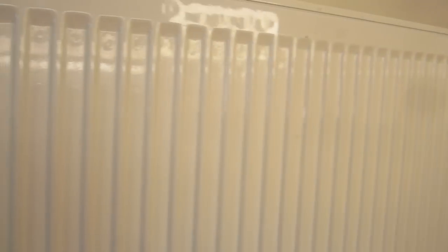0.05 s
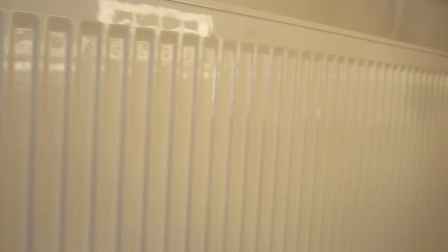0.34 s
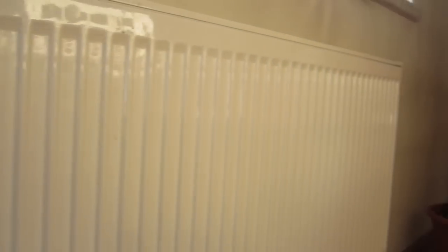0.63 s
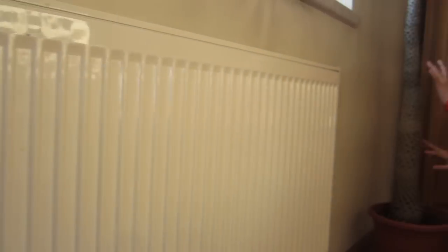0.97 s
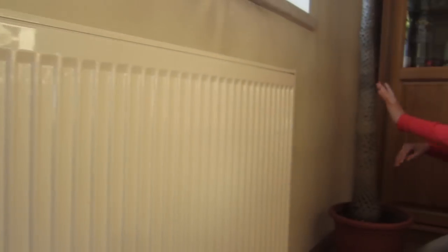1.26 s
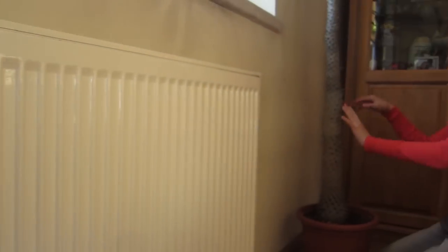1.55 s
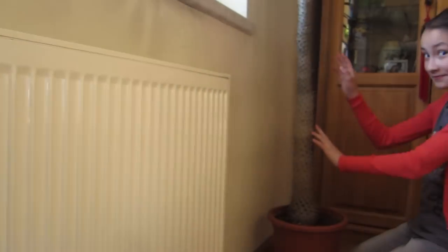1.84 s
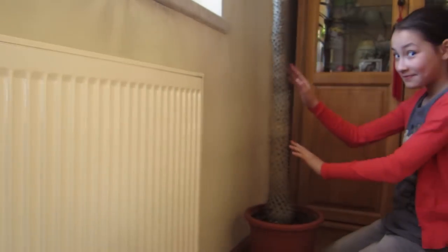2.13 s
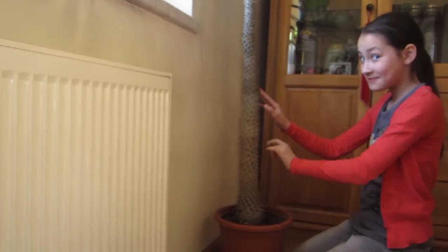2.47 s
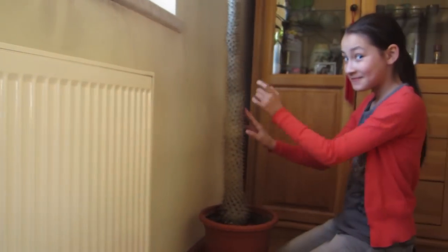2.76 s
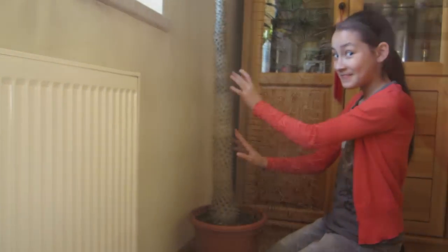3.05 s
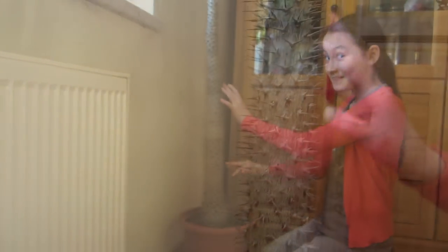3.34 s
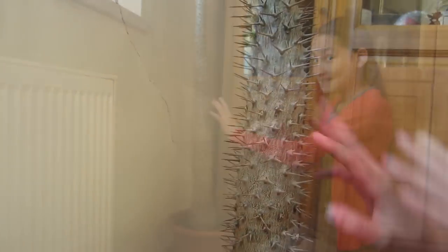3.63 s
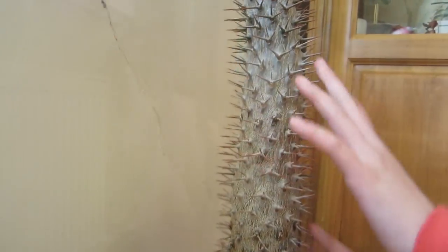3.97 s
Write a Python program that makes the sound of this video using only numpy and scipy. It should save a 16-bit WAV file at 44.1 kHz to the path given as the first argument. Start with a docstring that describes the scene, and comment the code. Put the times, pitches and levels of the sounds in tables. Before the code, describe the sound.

Fingers brush and pluck cactus thorns, making a quick, uneven patter of small drip-like plinks and high ticks. They echo slightly across a quiet room, then sound closer and louder near the end, over faint hiss and rumble.

```python
"""In a quiet, hard-walled room, fingers brush and pluck the thorns of a tall potted cactus.
Each thorn snaps off the fingertip and rings like a tiny rod held at one end: a drip-like plink
and a short high tick. Twice a finger bumps the stem. The first plucks are heard from across
the room, the last ones from close by, over a low rumble, hiss, a faint hum and a thin whine."""
import sys
import numpy as np
from scipy import signal
from scipy.fft import rfft, irfft
from scipy.io import wavfile

SR = 44100
rng = np.random.default_rng(int(sys.argv[2]) if len(sys.argv) > 2 else 0)


def inscribe(sig):
    """Save sig as 16-bit PCM at rate SR to the path in sys.argv[1].

    A 1-D sig is mono; a 2-D sig holds one channel per row.
    Samples are clipped to [-1, 1] before scaling.
    """
    pcm = np.round(np.clip(np.atleast_2d(sig).T, -1, 1) * 32767)
    wavfile.write(sys.argv[1], SR, pcm.astype(np.int16))


N = 176400  # 4 seconds

# One row for each plucked thorn; tick and snap levels are before their trims:
# (time [s], plink pitch [Hz], plink level [dB], tick pitch [Hz], tick level [dB], snap level [dB])
PLUCKS = [(0.0066, 2600, -57, 11800, -45.5, -53), (0.0302, 3970, -57.5, 11570, -54, -54),
          (0.0488, 2340, -64, 11780, -52, -54), (0.1066, 2270, -62, 12600, -51.5, -55),
          (0.179, 3310, -40, 7040, -59, -53), (0.2483, 2250, -56, 11470, -60, -64),
          (0.3515, 3050, -54, 13700, -53, -50), (0.4162, 2170, -60, 9800, -53, -59),
          (0.4462, 1900, -57, 9540, -57, -61), (0.4754, 1620, -52.5, 8520, -56, -51),
          (0.4913, 2190, -44, 9690, -46.5, -47.5), (0.5469, 2990, -70, 8750, -60, -49),
          (0.5957, 2950, -59, 10230, -55, -51.5), (0.6492, 2230, -40, 9700, -40.5, -50),
          (0.6605, 2160, -58, 9900, -58, -65), (0.6702, 2590, -38.5, 11400, -40, -46),
          (0.693, 2220, -55, 10550, -38, -45.5), (0.7477, 2390, -67, 10890, -53, -50),
          (0.7947, 1510, -57, 7620, -44, -49.5), (0.8552, 1710, -61, 10500, -50.5, -63),
          (0.8756, 2100, -51.5, 9560, -49, -52), (0.9509, 2780, -45.5, 11500, -43.5, -46.5),
          (1.0162, 2640, -48, 12600, -46.5, -52), (1.0446, 2100, -52.5, 11300, -54, -54),
          (1.0572, 2000, -52, 10940, -51, -61), (1.1279, 2630, -61, 12500, -49, -53),
          (1.1412, 2500, -53.5, 10600, -51, -63), (1.248, 3250, -78, 10400, -50.5, -49.5),
          (1.2673, 2120, -53, 12000, -56, -62), (1.286, 2020, -42.5, 9260, -47, -49),
          (1.319, 2360, -53, 10000, -52, -52), (1.339, 2040, -46, 10000, -42, -43.5),
          (1.5132, 1960, -47.5, 10450, -47.5, -49), (1.532, 2340, -50.5, 9000, -47.5, -50),
          (1.5385, 2100, -51, 9500, -47, -53), (1.5563, 3500, -58, 9800, -43.5, -47),
          (1.5899, 2330, -44, 10600, -48, -44.5), (1.6432, 3300, -43.5, 12900, -43, -50),
          (1.6817, 2000, -52, 9850, -43, -48), (1.7067, 2200, -49, 9720, -59, -50.5),
          (1.732, 1630, -54.5, 8300, -46.5, -61), (1.7513, 3580, -58, 12100, -56, -61),
          (1.8319, 1840, -48.5, 12090, -59, -54.5), (1.8738, 1690, -53.5, 10350, -51, -53),
          (1.9261, 3450, -45.5, 12310, -61, -58), (1.936, 2600, -56, 11400, -56.5, -65),
          (2.0152, 2580, -61, 12100, -55, -58), (2.064, 2800, -53.5, 12000, -47.5, -50),
          (2.111, 3020, -64, 12170, -56, -53), (2.1578, 2840, -49, 13220, -58, -59),
          (2.241, 2420, -54, 10910, -63, -50), (2.3665, 2530, -53.5, 13300, -57, -64),
          (2.3788, 2780, -69, 10100, -51, -51), (2.3875, 2600, -61, 9600, -51.5, -56),
          (2.408, 3420, -59.5, 9150, -59, -50), (2.4982, 1700, -52.5, 8500, -55.5, -55),
          (2.5161, 2210, -48, 10200, -49.5, -57), (2.6172, 3230, -60.5, 11240, -55, -54.5),
          (2.6562, 2750, -57, 9750, -47, -55), (2.6702, 1890, -58, 9680, -68, -53),
          (2.6985, 1870, -63, 10000, -62, -53), (2.736, 2680, -54, 11000, -49.5, -52.5),
          (2.7559, 2600, -52, 12590, -48, -58), (2.7793, 3020, -64, 11480, -45.5, -51),
          (2.8271, 2550, -58, 12200, -48, -61), (2.8415, 2600, -65, 13600, -49, -54),
          (2.8528, 2110, -51, 11220, -52, -47.5), (2.8759, 3640, -54.5, 12000, -49, -49),
          (2.9506, 1800, -52.5, 9300, -54, -56), (2.9848, 1760, -53, 10100, -48.5, -52),
          (3.0046, 1720, -51, 10010, -57, -61), (3.022, 1700, -48.5, 9210, -50, -49.5),
          (3.044, 3600, -51.5, 8960, -55, -55), (3.1232, 2700, -53, 11620, -38, -53),
          (3.1388, 3540, -51.5, 14000, -62, -54), (3.1571, 2740, -46, 11340, -48, -50),
          (3.1648, 2070, -52, 10000, -43.5, -52), (3.1969, 2470, -54, 12680, -56, -49),
          (3.2147, 2630, -50, 10300, -46.5, -52), (3.2231, 2740, -50, 13800, -49, -56),
          (3.2747, 2370, -48, 13140, -47.5, -45.5), (3.3076, 1940, -49, 10900, -49, -52),
          (3.3296, 2740, -47, 13810, -51, -52), (3.3592, 4100, -55, 12800, -60, -60),
          (3.3907, 2550, -50, 9710, -64, -49), (3.4892, 4370, -60, 10770, -56, -57),
          (3.503, 2110, -54, 10430, -39, -52), (3.5246, 2000, -58, 8500, -63, -44.5),
          (3.5607, 2620, -66, 9490, -58, -59), (3.5831, 3040, -40, 12200, -46, -54),
          (3.6097, 2420, -42, 10060, -34, -43.5), (3.6544, 2250, -47, 10200, -33, -53),
          (3.6703, 2570, -36, 10500, -29, -47), (3.6883, 3060, -31, 13000, -41, -52),
          (3.7144, 1880, -45, 11370, -41.5, -47.5), (3.7225, 2060, -41.5, 10600, -44, -54),
          (3.7534, 1470, -54, 8940, -53, -58), (3.7666, 1700, -50.5, 8750, -43.5, -51),
          (3.7896, 1550, -45.5, 7900, -41, -42), (3.8278, 1690, -50, 9550, -39.5, -47.5),
          (3.8462, 1870, -56, 11840, -62, -52), (3.8747, 2870, -39.5, 11600, -45.5, -51),
          (3.8966, 2220, -61, 10100, -54, -48), (3.9034, 1840, -41, 10100, -45, -49),
          (3.9246, 4370, -38, 9860, -67, -59), (3.9442, 2450, -39.5, 10600, -40, -41.5),
          (3.9852, 1870, -47, 12600, -36, -45.5)]
# Tone colour of a thorn slipping off the fingertip: (frequency [Hz], relative level [dB])
SNAP_SPECTRUM = [(300, -26), (1200, -11), (2500, 5.5), (4000, 4), (6000, 2), (10000, 7.5), (14000, 0),
                 (16000, -14)]
# How hard the fingers brush, and how the thorns under them ring: (time [s], effort [dB], pitch [Hz])
BRUSH_STROKES = [(0, 7.5, 2380), (.3, -2, 2390), (.6, 0, 2020), (.72, 9.5, 2380), (.84, 3.5, 1660),
                 (1.02, 0.5, 3030), (1.3, -1.5, 2000), (1.45, -8, 2030), (1.58, 7, 2200), (1.75, 0, 1860),
                 (1.95, -26, 2650), (2.3, -8, 2450), (2.6, -8, 1860), (2.85, -6, 2600), (2.98, -2, 1780),
                 (3.06, 5, 3380), (3.25, 2, 2640), (3.48, 1.5, 3930), (3.62, -14, 2800), (4, 2, 1870)]
# A finger bumps the stem: (time [s], level [dB])
STEM_BUMPS = [(0.38, -51.5), (3.879, -46.5)]
# The tones the stem rings with: (pitch [Hz], relative level [dB], time to fade by 60 dB [s])
STEM_TONES = [(162, -13, .12), (243, -6, .07), (370, -5, 0.028), (427, -2, 0.035), (590, -4, 0.038),
              (855, -4, 0.017), (1330, -3, 0.0054)]
# How close the cactus sounds: (time [s], gain of the direct sound over the room [dB])
CLOSENESS = [(0, 6), (3.3, 7.5), (3.55, 16), (4, 16.5)]
# Steady room noise and microphone hiss: (frequency [Hz], relative level [dB])
ROOM_NOISE_SPECTRUM = [(12, 7), (22, -2), (40, 2), (58, -4), (85, -2.5), (120, -3.5), (160, -8.5),
                       (215, -5.5), (290, -9.5), (450, -12.5), (900, -17), (1400, -17.5), (2600, -22),
                       (5800, -25), (10000, -29), (13300, -29), (14200, -61), (15000, -87)]
# Tone colour of the low rumble: (frequency [Hz], relative level [dB])
RUMBLE_SPECTRUM = [(10, -15), (25, 2.5), (42, -3.5), (60, -6), (150, -34)]
# How the rumble swells and sinks: (time [s], level [dB])
RUMBLE_SWELLS = [(0, -60.5), (.4, -54), (.6, -74), (1.5, -73), (1.75, -57), (2.1, -73), (2.4, -71),
                 (3.4, -63.5), (3.58, -51.5), (3.75, -60), (3.92, -48), (4, -54)]
# How the faint hum swells and sinks: (time [s], level [dB])
HUM_SWELLS = [(0, -62.5), (.8, -65), (1.0, -60), (2.2, -62), (2.4, -78)]

RING_SAMPLES, RISE_S = 2048, 0.00085  # length of one ring; how quickly a plink or knock swells
PLINK_CYCLES, PLINK_DELAY_S = 25, 0.00036  # swings to fade by 60 dB; lag after the tick
TWIN_RATIO, TWIN_DB = 1.157, -7.5  # the plink's second tone: widest pitch ratio, relative level
TICK_TRIM_DB, SNAP_TRIM_DB = 1.5, -0.5
GRAZES_PER_S, GRAZE_DB, GRAZE_SPREAD_DB = 45, -61.5, 3
SCATTER_DB, SCATTER_DELAY_S, ROOM_DELAY_S = 3.5, 0.0008, 0.006  # nearby echoes, then the room's echo
LEVEL_S = 0.0076  # a short sound's level counts its energy as if spread over this time


def plucked_thorns():
    """Each plucked thorn sends its plink, tick and snap into the room."""
    out = np.zeros(N)
    for s, plink_hz, plink_db, tick_hz, tick_db, snap_db in PLUCKS:
        plink, tick, snap = thorn(plink_hz, tick_hz)
        add(out, s + PLINK_DELAY_S, amp(plink_db) * in_room(plink, s, room_db=2.5))
        add(out, s, amp(tick_db + TICK_TRIM_DB) * in_room(tick, s, room_db=1.5))
        add(out, s, amp(snap_db + SNAP_TRIM_DB) * in_room(snap, s, room_db=3.5))
    return out


def thorn(plink_hz, tick_hz):
    """A thorn slips free (snap) and shakes in a slower way (plink) and a faster way (tick) at once."""
    t = np.arange(RING_SAMPLES) / SR
    snap = noise(SNAP_SPECTRUM, len(t)) * fade(t, fade_s=0.0069)
    # A slightly oval thorn bends in two directions, each with its own pitch.
    twin_hz = plink_hz * TWIN_RATIO ** rng.uniform(-0.87, 1)
    fade_s = PLINK_CYCLES / plink_hz
    plink = ring(t, plink_hz, fade_s) + amp(TWIN_DB) * ring(t, twin_hz, fade_s)
    tick = ring(t, tick_hz, fade_s=0.0016, rise_s=0.00026)
    return unit_energy(plink), unit_energy(tick), unit_energy(snap)


def grazed_thorns():
    """Sliding fingers set off faint random plucks, heard mostly through the room's echo."""
    direct = np.zeros(N)
    times, effort_db, pitch_hz = np.transpose(BRUSH_STROKES)
    for k, (time_shift, strength, pitch_shift) in enumerate(rng.standard_normal((240, 3))):
        s = (k + time_shift) / GRAZES_PER_S
        plink_hz = np.interp(s, times, pitch_hz) * np.exp(0.1245 * pitch_shift)
        plink, tick, snap = thorn(plink_hz, tick_hz=min(4.55 * plink_hz, SR / 2.2))
        gain = amp(GRAZE_DB + np.interp(s, times, effort_db) + GRAZE_SPREAD_DB * strength)
        add(direct, s, gain * (plink + amp(-3) * tick + amp(-4) * snap))
    echo = signal.fftconvolve(direct, unit_energy(room_echo()))[:N]
    return (amp(-5) * direct + echo) * np.sqrt(LEVEL_S * SR)


def stem_knocks():
    """The fleshy stem gives a dull knock when a finger bumps it."""
    out = np.zeros(N)
    t = np.arange(RING_SAMPLES) / SR
    knock = sum(amp(db) * ring(t, hz, fade_s) for hz, db, fade_s in STEM_TONES)
    for s, db in STEM_BUMPS:
        add(out, s, amp(db) * in_room(knock, s, room_db=2.5))
    return out


def in_room(sound, s, room_db):
    """A sound made at time s scatters off the stem, wall and cupboard, then echoes round the room."""
    t = np.arange(len(sound)) / SR
    close_db = curve(CLOSENESS, s)
    bounces = rng.standard_normal(len(sound))
    bounces *= np.abs(bounces)  # a few bounces stand out
    scatter = signal.fftconvolve(sound, bounces * fade(t, fade_s=0.028))
    scatter_db = SCATTER_DB - 0.41 * close_db  # coming closer weakens it less than the room's echo
    out = np.zeros(SR // 2)
    add(out, 0, unit_energy(sound))
    add(out, SCATTER_DELAY_S, amp(scatter_db) * unit_energy(scatter))
    out = unit_energy(out)  # this early part is equally strong near and far
    echo = signal.fftconvolve(sound, room_echo())
    add(out, ROOM_DELAY_S, amp(room_db - close_db) * unit_energy(echo))
    return out * np.sqrt(LEVEL_S * SR)


def room_echo(split_hz=5100):
    """The hard walls answer a click with a wash of noise whose treble dies first."""
    t = np.arange(16384) / SR
    hz = np.fft.rfftfreq(len(t), 1 / SR)
    white = rng.standard_normal(len(t))
    low = irfft(rfft(white) / (1 + (hz / split_hz) ** 2))
    high = white - low
    return low * fade(t, fade_s=0.43) + high * fade(t, fade_s=0.24)


def background():
    """Steady room noise and hiss, with a low rumble and a faint hum that swell and sink."""
    t = np.arange(N) / SR
    room_noise = amp(-53) * noise(ROOM_NOISE_SPECTRUM, N)
    rumble = amp(curve(RUMBLE_SWELLS, t)) * noise(RUMBLE_SPECTRUM, N)
    hum = amp(curve(HUM_SWELLS, t)) * narrow_noise(centre_hz=92.8, width_hz=3)
    return room_noise + rumble + hum


def electrical_whine(pitch_hz=7840, flutter_hz=15):
    """A thin electrical tone of steady strength whose pitch flutters a little."""
    hz = pitch_hz + flutter_hz * narrow_noise(centre_hz=0, width_hz=22)
    return amp(-72) * unit_rms(np.sin(2 * np.pi * np.cumsum(hz) / SR))


def ring(t, hz, fade_s, rise_s=RISE_S):
    """One pure tone that swells quickly and dies away."""
    return np.sin(2 * np.pi * hz * t) * fade(t, fade_s) * (1 - np.exp(-t / rise_s))


def fade(t, fade_s):
    """A gain that falls by 60 dB every fade_s seconds."""
    return amp(-60 * t / fade_s)


def noise(spectrum, size):
    """Noise with the tone colour given by a spectrum table."""
    table_hz, table_db = np.transpose(spectrum)
    hz = np.fft.rfftfreq(size, 1 / SR)
    db = np.interp(np.log(hz + 1), np.log(table_hz + 1), table_db)
    return unit_rms(irfft(rfft(rng.standard_normal(size)) * amp(db), size))


def narrow_noise(centre_hz, width_hz):
    """A thin band of noise: an unsteady tone, or a slow wobble when centred on 0 Hz."""
    hz = np.fft.rfftfreq(N, 1 / SR)
    band = np.exp(-((hz - centre_hz) / width_hz) ** 2)
    return unit_rms(irfft(rfft(rng.standard_normal(N)) * band, N))


def amp(db):
    """Turn decibels into a number to multiply by."""
    return 10 ** (np.asarray(db) / 20)


def unit_rms(x):
    """Scale a sound so that its average power is 1."""
    return x / np.sqrt(np.mean(x ** 2) + 1e-20)


def unit_energy(x):
    """Scale a sound so that its total energy is 1."""
    return x / np.sqrt(np.sum(x ** 2) + 1e-20)


def curve(points, s):
    """Join (time, value) points with straight lines and read the value at time s."""
    return np.interp(s, *np.transpose(points))


def add(track, s, sound):
    """Mix a sound into the track, starting at s seconds."""
    part = track[max(round(s * SR), 0):][:len(sound)]
    part += sound[:len(part)]


def scene():
    """The background and the cactus together, the same on the left and right."""
    mono = background() + electrical_whine() + plucked_thorns() + stem_knocks() + grazed_thorns()
    return np.array([mono, mono])


def record(dry):
    """Cut away the very highest treble, above 15100 Hz."""
    low_pass = signal.ellip(10, 0.2, 80, 15100, fs=SR, output="sos")
    return signal.sosfilt(low_pass, dry)


dry = scene()
out = record(dry)
inscribe(out)
```